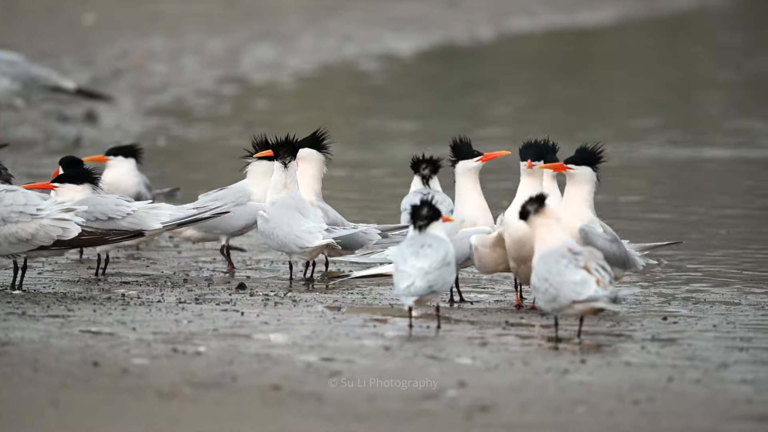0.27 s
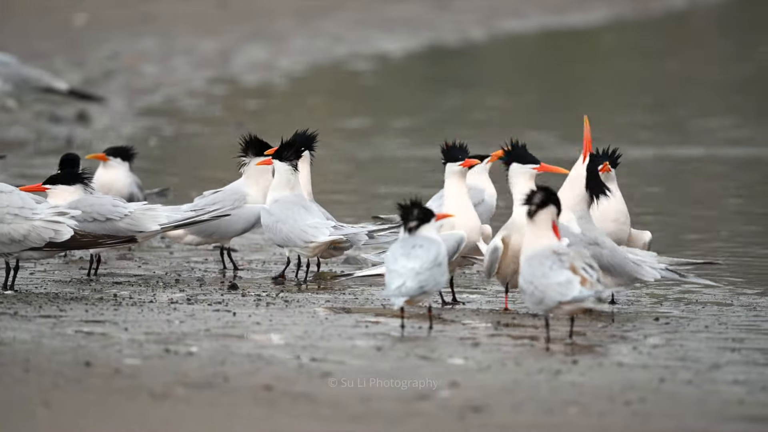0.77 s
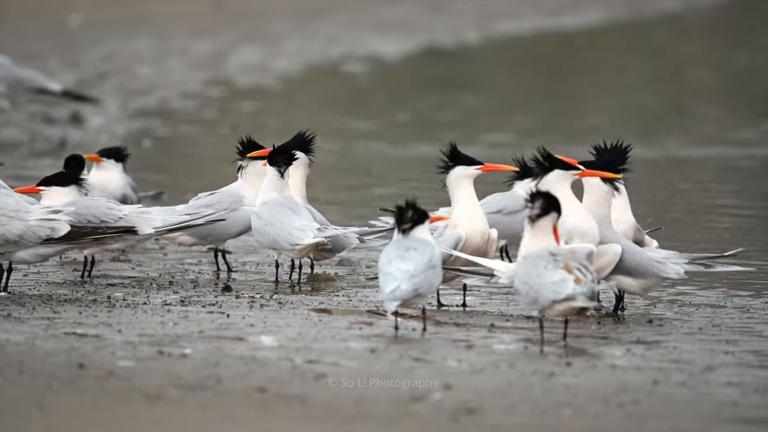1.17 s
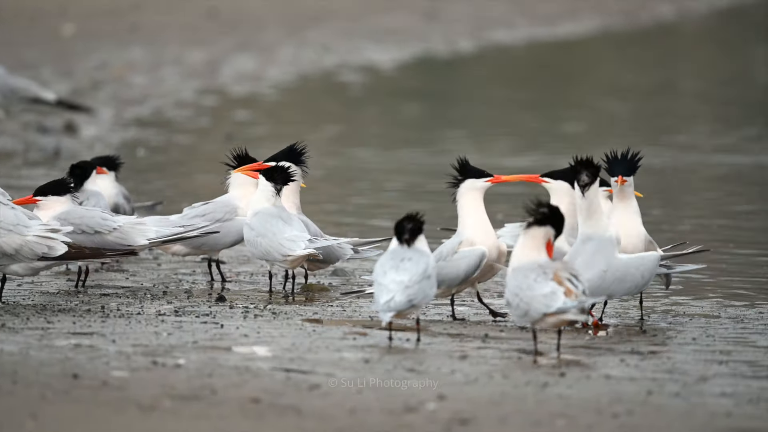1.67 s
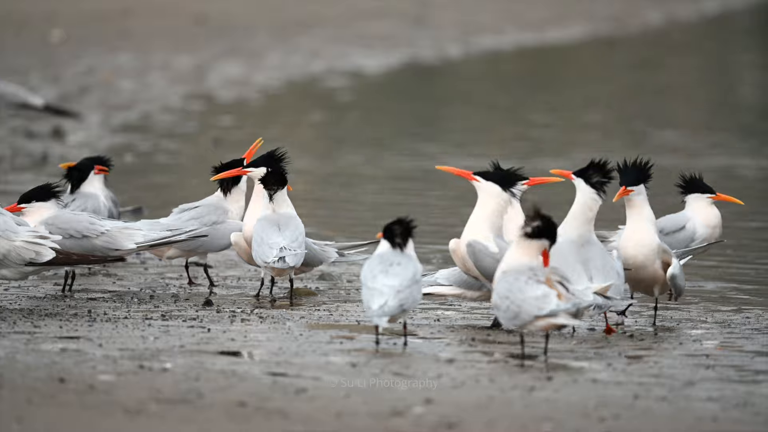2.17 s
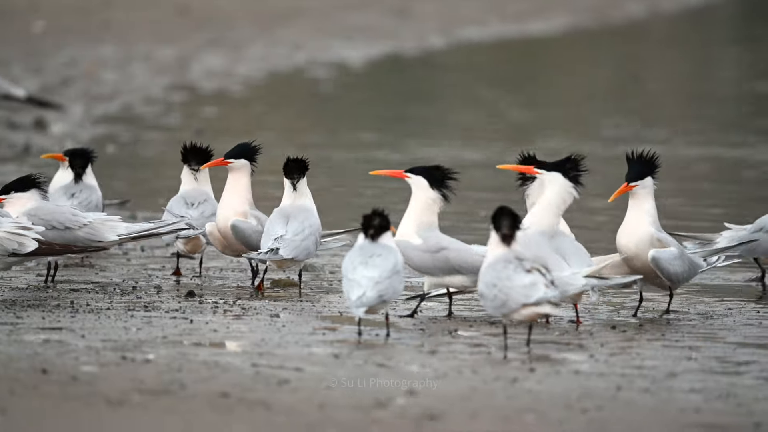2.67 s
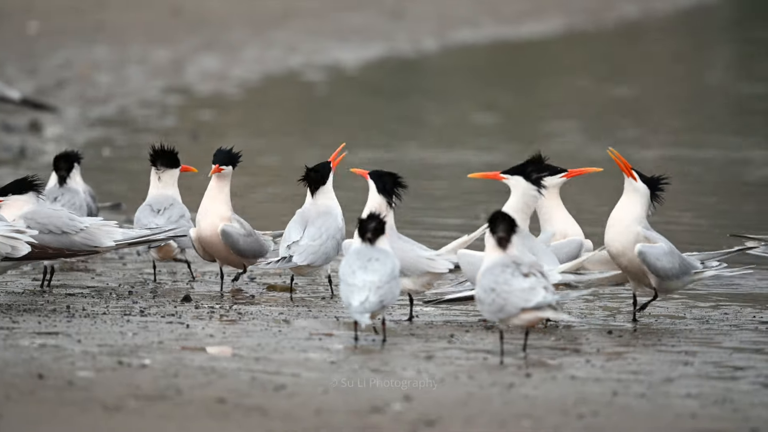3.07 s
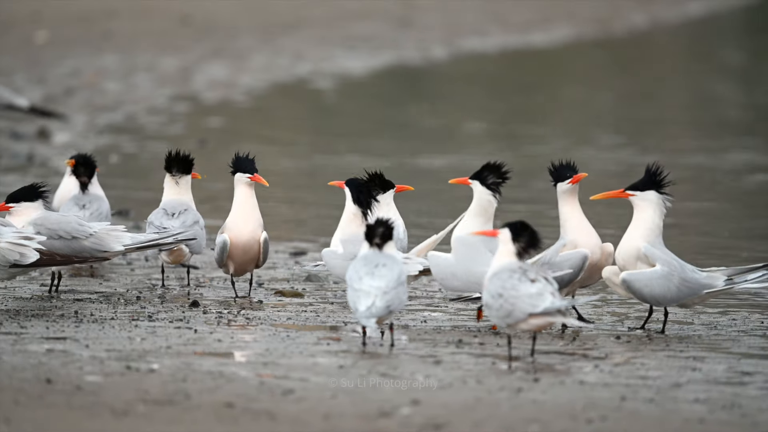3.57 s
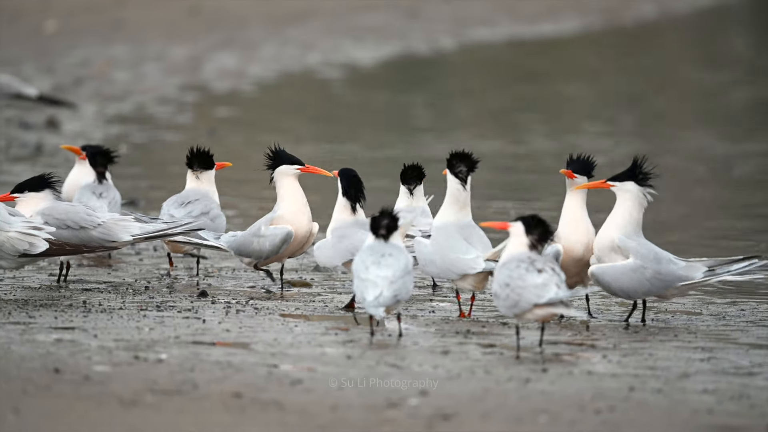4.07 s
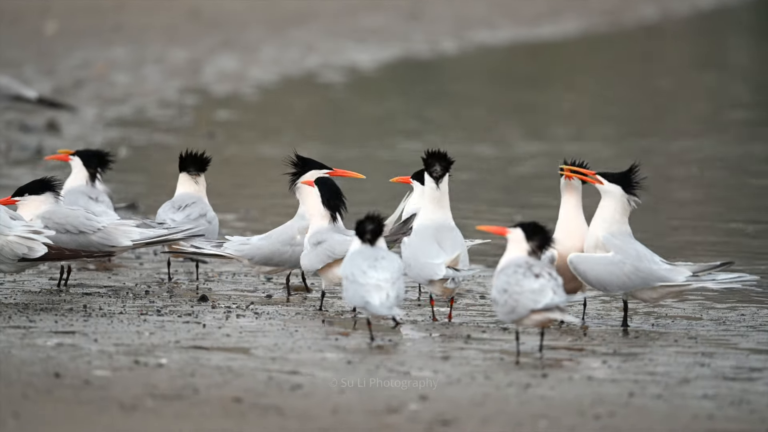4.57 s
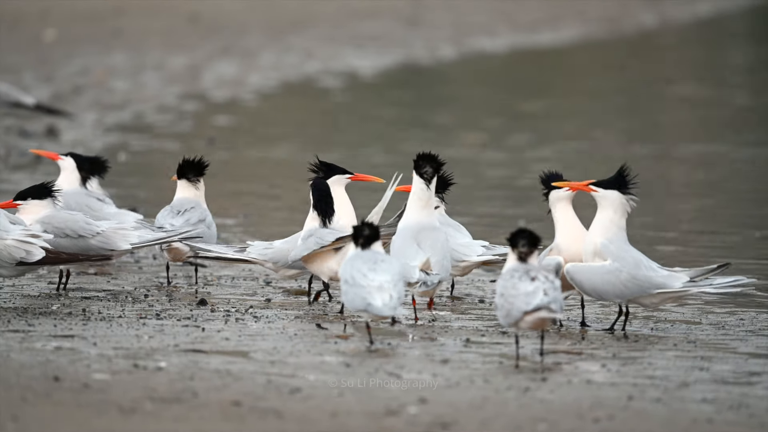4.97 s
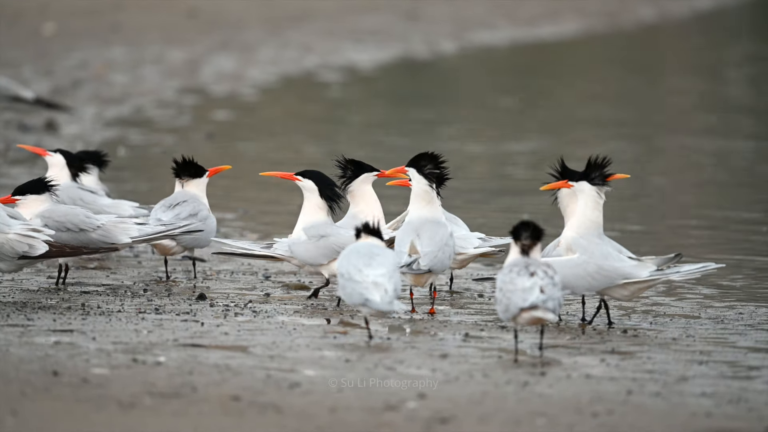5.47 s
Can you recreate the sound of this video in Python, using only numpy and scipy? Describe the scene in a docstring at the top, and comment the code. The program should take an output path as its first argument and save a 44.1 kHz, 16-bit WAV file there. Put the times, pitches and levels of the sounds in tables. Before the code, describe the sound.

A flock of terns calls a few metres away on an open shore, heard in stereo over a steady low wash of surf. Wind rumbles, strongest at the start and leaning left. Grating chatter and short, clear yelps begin at once, building into a flurry of shrieks with high hiss from about 0.6 to 1 second. A few light taps fall between 1.2 and 1.5 seconds among more cries, and hoarse rattles follow around 1.5 and 2.3 seconds. The loudest run of sharp shrieks comes from 2 to 2.7 seconds. Pulsing trills, yelps and shrieks overlap again from 3 to 4 seconds. The calls then thin out, with two soft, dull thuds near 4.2 seconds. Chatter and shrieks return at about 4.7 seconds and again near 5.3, ending with a couple of softer yelps around 5.7. Faint distant birds call now and then.

```python
"""A wet shore, with a flock of terns courting a few metres from a stereo microphone.
Surf and gusting wind make a steady low wash. The birds chatter in grating pulses, yelp in clear arches
and shriek an octave up as their odd harmonics drop out; each cry is syrinx harmonics plus air noise,
shaped by throat and bill. Bursts of hiss, a few taps, hoarse rattles and faint far birds come between."""
import sys
import numpy as np
from scipy import signal
from scipy.fft import rfft, irfft, next_fast_len
from scipy.io import wavfile
from scipy.ndimage import uniform_filter1d, map_coordinates

SR = 44100
rng = np.random.default_rng(int(sys.argv[2]) if len(sys.argv) > 2 else 0)


def dump(signal):
    """Clip the signal to [-1, 1] and save it as 16-bit WAV at the path in sys.argv[1]."""
    limited = np.clip(np.atleast_2d(signal).T, -1, 1)
    pcm = np.round(limited * 32767).astype(np.int16)
    wavfile.write(sys.argv[1], SR, pcm)


N = 252252


def amp(db):
    """Decibels to gain."""
    return 10 ** (np.asarray(db) / 20)


def unit(x):
    """x at rms 1."""
    return x / np.sqrt(np.mean(x ** 2) + 1e-20)


def along(points, hz):
    """(Hz, value) points interpolated on a log frequency axis."""
    knots_hz, values = np.transpose(points)
    return np.interp(np.log(hz + 1), np.log(knots_hz), values)


def wobble(n, knots_per_s):
    """n samples of a smooth random curve."""
    knots = rng.standard_normal(int(n * knots_per_s / SR) + 4)
    return map_coordinates(knots, [1 + np.arange(n) * knots_per_s / SR])


def filtered(x, gain):
    """x with its spectrum scaled by gain(Hz)."""
    n = x.shape[-1]
    size = next_fast_len(2 * n)
    return irfft(rfft(x, size) * gain(np.fft.rfftfreq(size, 1 / SR)), size)[..., :n]


def band(hz, low_hz, high_hz, order):
    """Band-pass gain."""
    return 1 / np.sqrt((1 + (low_hz / (hz + 1)) ** (2 * order)) * (1 + (hz / high_hz) ** (2 * order)))


def band_noise(shape, low_hz, high_hz, order):
    """Band-passed white noise."""
    return filtered(rng.standard_normal(shape), lambda f: band(f, low_hz, high_hz, order))


def gate(n, rise_s, fall_s):
    """Envelope of n samples with rounded edges."""
    t = np.arange(n) / SR
    rise = np.sin(np.pi / 2 * np.minimum(t / rise_s, 1))
    fall = np.sin(np.pi / 2 * np.minimum(t[::-1] / fall_s, 1))
    return rise * fall


def add(track, start_s, sound):
    """Mix a sound into the track."""
    part = track[:, max(round(start_s * SR), 0):][:, :sound.shape[-1]]
    part += sound[..., :part.shape[-1]]


# Spectrum of surf and wind. Each row: frequency in Hz, relative density in dB.
WASH_SPECTRUM = [(15, -55), (25, -10.5), (86, 0), (204, -5), (313, -5.5), (445, -13.5), (782, -18),
                 (871, -13.5), (1200, -26), (1450, -24), (2850, -38), (15500, -65)]
# Stereo likeness of the wash. Each row: frequency in Hz, left-right correlation.
WASH_CORRELATION = [(100, 0.22), (330, 0.88), (620, 0.86), (1100, 0.68), (2000, 0.25), (6000, 0.072)]
# Wind rumble. Each row: time in seconds, relative level in dB.
WIND_LEVELS = [(0.0, -26), (0.16, -30.5), (5.72, -35.5)]


def surf_and_wind(surf_db=-33.5, gust_db=2.0, gusts_per_s=22.137):
    """Surf washes steadily; wind swells the bass, more on the left."""
    def mid_side_gain(hz):
        angle = np.arccos(np.clip(along(WASH_CORRELATION, hz), -1, 1)) / 2
        return amp(along(WASH_SPECTRUM, hz)) * [np.cos(angle), np.sin(angle)]

    mid, side = filtered(rng.standard_normal((2, N)), mid_side_gain)
    wash = unit(np.array([mid + side, mid - side]))
    bass = filtered(wash, lambda f: band(f, 1, 250, order=3))
    wind_db = np.interp(np.arange(N) / SR, *np.transpose(WIND_LEVELS)) + 0.5
    wind = unit(bass * amp(gust_db * wobble(N, gusts_per_s)) * amp([[0], [-7]]))
    return amp(surf_db) * (wash - bass) + amp(wind_db) * wind


# Stereo response towards the flock. Each row: frequency in Hz, left over right in dB,
# left phase lead in radians.
MIC_RESPONSE = [(990, 1, -1), (1685, -9, -1.5), (2360, 5.5, 1.5), (2347, 11, 2.1), (2947, -11, -3.5),
                (3776, -2, 2.5), (4180, -6.5, 1.5), (5200, -1, 0.31), (6060, 3.5, 2), (8000, 2, 1.43),
                (12000, -0.5, 1.6)]


def mic_gains(hz):
    """Complex left and right microphone gains for a cry."""
    knots_hz, lean_db, lead_rad = np.transpose(MIC_RESPONSE)
    lean = amp(np.interp(hz, knots_hz, lean_db))
    turn = np.exp(.5j * np.interp(hz, knots_hz, lead_rad))
    return np.array([lean * turn, 1 / turn]) * np.sqrt(2 / (1 + lean ** 2))


# Response of a tern's throat and open bill. Each row: frequency in Hz, gain in dB.
THROAT_RESPONSE = [(980, -7.5), (1300, -14.5), (2200, -0.5), (3300, -7.5), (4500, -6), (5300, -15),
                   (6500, -26), (8500, -31.5), (15000, -46)]


def syrinx(pitch_hz, db, upper_db, odd_db, jitter, shimmer_db, hiss_db, shrill_db=0):
    """One stereo cry: harmonics of an unsteady pitch, plus air noise, through the throat."""
    n, k = len(pitch_hz), np.arange(1, 15)[:, None]
    phase = 2 * np.pi * np.cumsum(pitch_hz * (1 + jitter * wobble(n, 595))) / SR
    hz = k * pitch_hz
    level_db = db + along(THROAT_RESPONSE, hz) + upper_db * (k > 2)
    level_db += odd_db * (k % 2) * np.where(k > 1, 1, .35)
    # Loud cries put their power in the low harmonics; the high ones vary from cry to cry.
    level_db += (hz > 6000) * (shrill_db + rng.normal(0, 3, k.shape) - .5 * (db + upper_db + 36))
    pan_db = rng.normal(0, 1.65, k.shape) * np.array([1, -1])[:, None, None]
    phasors = np.exp(1j * (k * phase + rng.uniform(0, 2 * np.pi, k.shape)))
    harmonics = np.real(mic_gains(hz) * amp(pan_db) * phasors)
    level_db += shimmer_db * np.tanh(wobble(n, 433.5))
    tone = np.sqrt(2) * np.sum(amp(level_db) * harmonics, axis=1)

    def air_gain(f):
        bill_db = 1.9 * upper_db * np.clip((f - 2400) / 900, 0, 1)  # a half-closed bill dulls the air
        return amp(along(THROAT_RESPONSE, f) + bill_db) * band(f, 1140, SR, order=3) * mic_gains(f)

    air = unit(filtered(rng.standard_normal(n), air_gain))
    return tone + amp(db + hiss_db) * air


def grate(length_s, hz, db, upper_db, rasp_db=-8):
    """One throaty pulse: the lower the pitch, the more irregularly the syrinx beats and rasps."""
    n = int(length_s * SR)
    rough = np.interp(hz, [1020, 1200], [1, .25])
    pitch_hz = hz * (1 + 0.046 * (.5 - np.linspace(-1, 1, n) ** 2))
    cry = syrinx(pitch_hz, db, upper_db, odd_db=-5 / rough, jitter=.03 * rough,
                 shimmer_db=2 * rough, hiss_db=-12 + 20 * np.log10(rough))
    rasp = unit(band_noise(n, 1520, 2140, order=7))
    return (cry + rough * amp(db + rasp_db) * rasp) * gate(n, .002, .007)


# Trills. Each row: first and last pulse in seconds, pulse count, stretch of the first gap as a
# fraction, pitch in Hz, source level in dB, drop by the end in dB, upper harmonic gain in dB.
TERN_TRILLS = [(.008, 0.024, 2, 0, 1100, -29, 4, -7.5), (0.101, .119, 2, 0, 1000, -35, 1.5, 0),
               (.338, 0.531, 9, -0.17, 1310, -43.5, 2.5, 5.5), (0.64, .729, 5, .35, 1000, -28, 0, -1),
               (.75, .892, 9, 0, 1090, -25.5, 11, 2), (0.963, 1.003, 3, -0.02, 1046, -33, 7.5, 5.5),
               (1.112, 1.132, 2, 0.2, 1000, -31, 2, -5.5), (1.518, 1.577, 4, 0, 977, -32, 18, -4),
               (2.178, 2.252, 5, 0, 1043, -29.5, -5, 1), (2.278, 2.34, 4, 0, 1020, -23.5, 5.5, -3),
               (2.935, 3.037, 6, -0.36, 1153, -31.5, -2, 2.5), (3.062, 3.163, 5, 0.06, 990, -30, 2, -6),
               (3.191, 3.278, 5, 0.5, 989, -25.5, 1, -5.5), (3.324, 3.432, 7, 0.25, 993, -28, 1, 0.5),
               (3.775, 3.996, 12, -0.04, 1083, -31.5, 11, 2.5), (4.744, 4.831, 5, 0.4, 979, -26.5, 2, -6.5),
               (4.848, 4.992, 9, 0, 977, -27.5, 18, -3.5), (5.223, 5.349, 7, 0.14, 1029, -35.5, -3, -2.5)]


def chatter(settle_pulses=2.3, fade_power=3.4, duty=0.68):
    """Trills of grating pulses that settle towards an even beat; most fade at the end."""
    out = np.zeros((2, N))
    for first_s, last_s, count, stretch, hz, db, fade_db, upper_db in TERN_TRILLS:
        span_s = last_s - first_s
        gaps_s = 1 + stretch * np.exp(-np.arange(round(count)) / settle_pulses)
        gaps_s *= span_s / gaps_s[:-1].sum()
        offsets_s = np.cumsum(gaps_s) - gaps_s
        scatter = rng.standard_normal((len(gaps_s), 3)) * [.045, 1.6, .0013]
        for offset_s, gap_s, (detune, accent_db, late_s) in zip(offsets_s, gaps_s, scatter):
            level_db = db - fade_db * (offset_s / span_s) ** fade_power + accent_db
            length_s = duty * gap_s
            pulse = grate(length_s, hz * (1 + detune), level_db, upper_db)
            add(out, first_s + offset_s + late_s - length_s / 2, pulse)
    return out


def note(length_s, top_hz, db, upper_db, shrill_db, odd_db, crest, bend_per_s):
    """A wavering pitch arch; loud notes start abruptly and turn hoarse with their odd harmonics."""
    n = int(length_s * SR)
    arch = 1 - bend_per_s * length_s * (np.linspace(0, 1, n) - crest) ** 2
    pitch_hz = top_hz * arch * (1 + .012 * wobble(n, 110))
    effort = np.clip((db + 43) / 12, 0, 1)
    hoarse = effort * np.clip(1 + odd_db / 50, .2, 1)
    cry = syrinx(pitch_hz, db, upper_db, odd_db, jitter=.005 + .009 * hoarse,
                 shimmer_db=1.7 + 2.2 * hoarse, hiss_db=-29 + 13 * hoarse, shrill_db=shrill_db)
    sag_db = 22 * (arch - arch.mean())  # weaker as the pitch falls
    edge_s = .022 - .018 * effort
    return cry * amp(sag_db) * gate(n, edge_s, edge_s)


# Yelps. Each row: start and end in seconds, top pitch in Hz, source level in dB,
# upper harmonic gain in dB, shrillness above 6 kHz in dB.
TERN_YELPS = [(0.013, .108, 990, -37.5, -3.5, 12), (0.075, 0.11, 1074, -33.5, -1.5, -2),
              (0.113, 0.163, 1290, -46, 0, -1), (0.219, 0.283, 996, -34, -9, -0.5),
              (0.661, 0.754, 1070, -36, -2, -6), (.889, .974, 1054, -35, 1, 3.5),
              (0.99, 1.052, 992, -35, -11.5, 1.5), (1.049, 1.102, 1205, -33.5, 1, 0),
              (1.137, 1.232, 1130, -41, -6.5, -1), (1.701, 1.787, 1150, -40, -5.5, -8),
              (1.937, 2.003, 1196, -50, -1, 1), (2.189, 2.253, 1233, -32.5, -1, 3),
              (2.69, 2.752, 906, -37.5, -13, -0.5), (2.763, 2.84, 920, -37.5, -16, 1),
              (3.422, 3.498, 1127, -34, -2.5, 0), (3.529, 3.611, 984, -37, -11, -0.5),
              (3.663, 3.735, 1132, -39.5, -5.5, -3), (3.768, 3.851, 1365, -30.5, 2.5, 2),
              (3.86, 3.954, 1245, -30.5, 1.5, -2), (3.927, 3.994, 1084, -31, -5.5, -7),
              (4.023, 4.091, 1250, -51, -12, -4), (4.45, 4.506, 1262, -48, 8.5, -0.5),
              (4.468, 4.529, 1077, -42.5, -2.5, -6), (4.54, 4.611, 1085, -40, -2.5, -6),
              (4.6, 4.644, 1080, -42.5, -12, -3), (5.093, 5.165, 1320, -42.5, 4.5, 5),
              (5.179, 5.242, 1036, -41.5, -8, -4), (5.221, 5.273, 1309, -28.5, 2, -5),
              (5.357, 5.421, 992, -33.5, -9.5, 0.5), (5.619, 5.692, 1245, -40.5, -4.5, 8.5),
              (5.644, 5.699, 969, -41, -16, -4)]


def yelps():
    """Full-voiced, nearly symmetrical arches with every harmonic present."""
    out = np.zeros((2, N))
    for start_s, end_s, hz, db, upper_db, shrill_db in TERN_YELPS:
        yelp = note(end_s - start_s, hz, db, upper_db, shrill_db, odd_db=0.5, crest=.48, bend_per_s=8.5)
        add(out, start_s, yelp)
    return out


# Shrieks. Each row: start and end in seconds, top pitch before the leap in Hz, crest as a fraction of
# the length, source level in dB, upper harmonic gain in dB, shrillness in dB, opening grate gain.
TERN_SHRIEKS = [(0.464, .504, 1400, .44, -41, 9, -13, 0.1), (0.59, 0.625, 1178, .25, -25.5, 6, 9.5, 0.48),
                (0.747, 0.795, 1099, 0.46, -25, 3, 4, 0.1), (0.795, .862, 1229, .34, -25, 0.5, -1, 0.8),
                (1.2, 1.26, 1085, .37, -27.5, -7.5, -2, .45),
                (1.362, 1.413, 1240, .22, -26.5, -2.5, 0.5, 0.63),
                (1.44, 1.515, 1454, 0.54, -34, -2, 5.5, 0.9), (2.022, 2.072, 1270, 0.21, -24.5, 1, 7, 0.85),
                (2.102, 2.175, 1473, .53, -32.5, 2, 6.5, 1),
                (2.325, 2.371, 1132, .3, -28.5, -0.5, -3.5, 0.13),
                (2.467, 2.542, 1259, .4, -21.5, -0.5, 5, .25),
                (2.555, 2.584, 1145, 0.19, -21, 0, 4.5, 0.18), (2.597, 2.619, 1070, 0.5, -20.5, 1, 2, 0.06),
                (2.634, 2.676, 1687, .6, -28.5, 13, 4.5, 0.07), (2.674, 2.702, 1118, 0.35, -28.5, 4, 5, 0),
                (3.124, 3.179, 1160, .45, -24.5, 0.5, 5.5, 0.1),
                (3.277, 3.331, 1091, 0.4, -24, -5, -1.5, 0.26), (3.32, 3.357, 1087, .35, -28, 2, 1, 0),
                (3.817, 3.868, 1303, 0.099, -26.5, -4, -6, 0.3),
                (3.868, 3.91, 1160, 0.097, -26.5, -3, -5, 0),
                (4.247, 4.292, 1104, 0.4, -39, 5.5, 5.5, 0.62),
                (4.689, 4.727, 1143, 0.365, -26.5, 2, 2, 0.45),
                (4.838, 4.898, 1090, 0.354, -29, -0.5, 2, 0.55),
                (5.258, 5.28, 1131, 0.24, -26, 0.5, -9, 0.2),
                (5.303, 5.32, 1070, 0.68, -24, 0.5, -10, 0.15), (5.349, 5.387, 1105, 0.54, -28.5, 0, -7, 0)]


def shrieks(leap_s=.028, grate_s=.015, grate_lead_s=.011):
    """Odd harmonics drop out mid-note, so the voice leaps an octave; most open with a grating pulse."""
    out = np.zeros((2, N))
    for start_s, end_s, hz, crest, db, upper_db, shrill_db, grate_gain in TERN_SHRIEKS:
        length_s = end_s - start_s
        t = np.arange(int(length_s * SR)) / SR
        odd_db = np.interp(np.minimum(t, t[::-1]), [0, leap_s], [-12, -48])
        add(out, start_s, note(length_s, hz, db, upper_db, shrill_db, odd_db, crest, bend_per_s=6.5))
        opening = grate_gain * grate(grate_s, .92 * hz, db, upper_db)
        add(out, start_s - grate_lead_s - grate_s / 2, opening)
    return out


# Bursts of hiss. Each row: start and end in seconds, level in dB.
HISS_BURSTS = [(0.619, 0.915, -44.5), (1.177, 1.351, -52), (3.143, 3.489, -52.5), (4.694, 5.012, -55.5)]


def hisses(pulses):
    """Brief high hiss that surges with each pulse of the chatter."""
    out = np.zeros((2, N))
    envelope = np.abs(uniform_filter1d(np.abs(pulses[0]), size=180))
    for start_s, end_s, db in HISS_BURSTS:
        n, half_s = int((end_s - start_s) * SR), (end_s - start_s) / 2
        surge = np.minimum(envelope[int(start_s * SR):][:n], .025) + 0.0039
        hiss = unit(surge * band_noise((2, n), 3000, 12500, order=4))
        add(out, start_s, amp(db) * hiss * gate(n, half_s, half_s))
    return out


# Taps and dull wind thumps. Each row: start in seconds, level in dB, ring frequency in Hz.
TAP_HITS = [(1.2023, -12.5, 1340), (1.3007, -20, 1180), (1.3379, -14, 1010), (1.5025, -15, 920),
            (1.912, -24.5, 7300), (4.149, -11.5, 175), (4.22, -11.5, 133)]


def taps(crack_db=-39.5, crack_decay_s=0.0011):
    """Knocks that ring for a cycle or two and crack faintly; dull thumps of wind come from the left."""
    out, t = np.zeros((2, N)), np.arange(SR // 20) / SR
    for start_s, db, hz in TAP_HITS:
        ring = amp(db) * np.sin(2 * np.pi * hz * t) * np.exp(-t * hz)
        crack = amp(crack_db) * rng.standard_normal((2, len(t))) * np.exp(-t / crack_decay_s)
        add(out, start_s, ring + crack if hz > 500 else np.outer([1, .35], ring))
    return out


# Hoarse rattles. Each row: start and end in seconds, puffs per second, level in dB.
RATTLE_TRAINS = [(1.415, 1.70, 51.6, -36), (2.213, 2.45, 49.5, -32.5)]


def rattles(puff_s=0.015):
    """Dull, toneless rattles: even trains of throaty puffs."""
    out, n = np.zeros((2, N)), int(puff_s * SR)
    for start_s, end_s, puffs_per_s, db in RATTLE_TRAINS:
        for onset_s in np.arange(start_s, end_s, 1 / puffs_per_s):
            puff = unit(band_noise(n, 1400, 2080, order=7))
            add(out, onset_s, amp(db) * puff * gate(n, 0.011, 0.014))
    return out


def far_birds(count=12, db=-58):
    """Birds further along the shore yelp faintly at random moments."""
    out, n = np.zeros((2, N)), SR // 14
    arch = 1 - .16 * np.linspace(-1, 1, n) ** 2
    for start_s, hz in rng.uniform([0, 900], [N / SR, 1300], (count, 2)):
        cry = syrinx(hz * arch, db, upper_db=0, odd_db=0, jitter=0, shimmer_db=0.91, hiss_db=-40)
        add(out, start_s, cry * np.hanning(n))
    return out


def beach_scatter(x, t60_s=0.43, wet_db=-21):
    """x plus its faint scatter from sand and water."""
    t = np.arange(SR // 2) / SR
    tail = rng.standard_normal((2, len(t))) * amp(-60 * t / t60_s)
    tail /= np.linalg.norm(tail[0])
    return x + amp(wet_db) * signal.fftconvolve(x, tail, axes=1)[:, :N]


def scene():
    """The flock on the open shore, over surf and wind."""
    pulses = chatter()
    flock = yelps() + shrieks() + pulses + rattles() + taps() + hisses(pulses) + far_birds()
    return beach_scatter(flock) + surf_and_wind()


def record(dry, cutoff_hz=15830):
    """Brick-wall low-pass."""
    return filtered(dry, lambda hz: hz < cutoff_hz)


dry = scene()
out = record(dry)
dump(out)
```